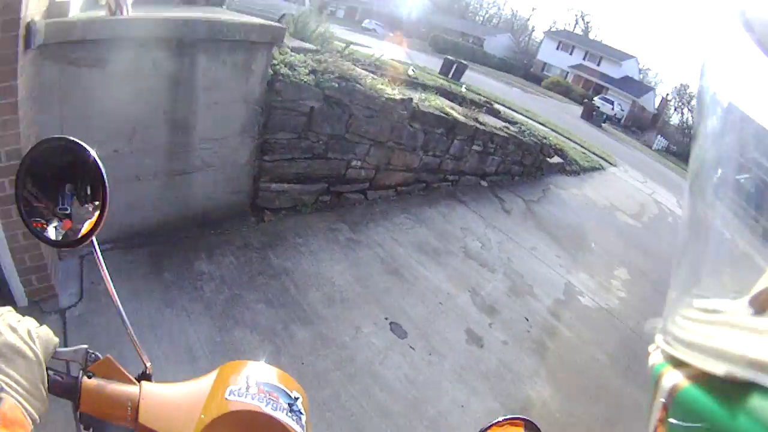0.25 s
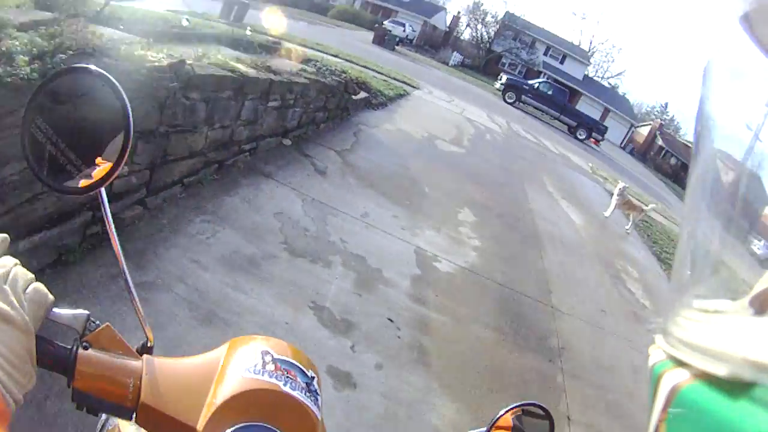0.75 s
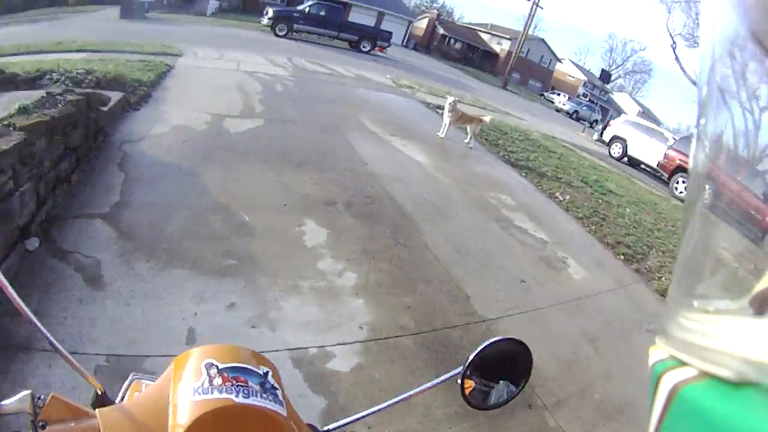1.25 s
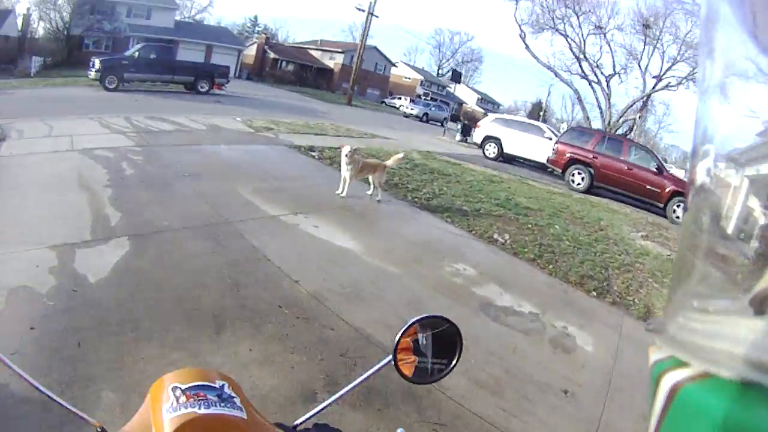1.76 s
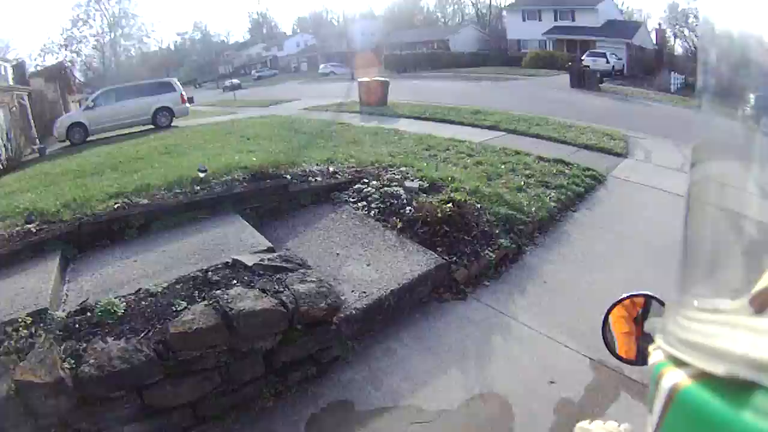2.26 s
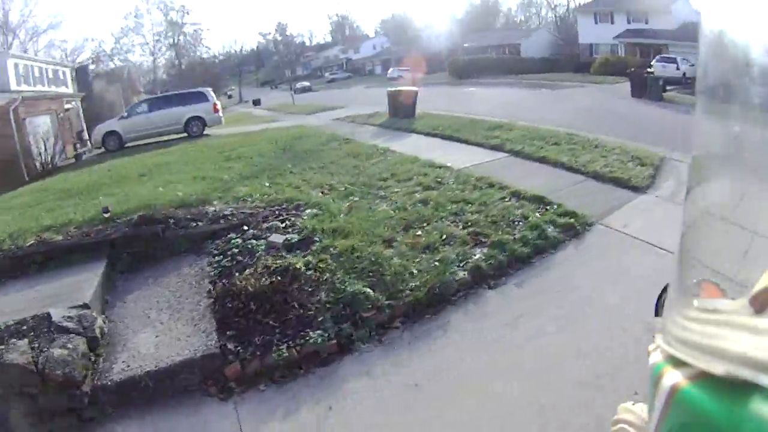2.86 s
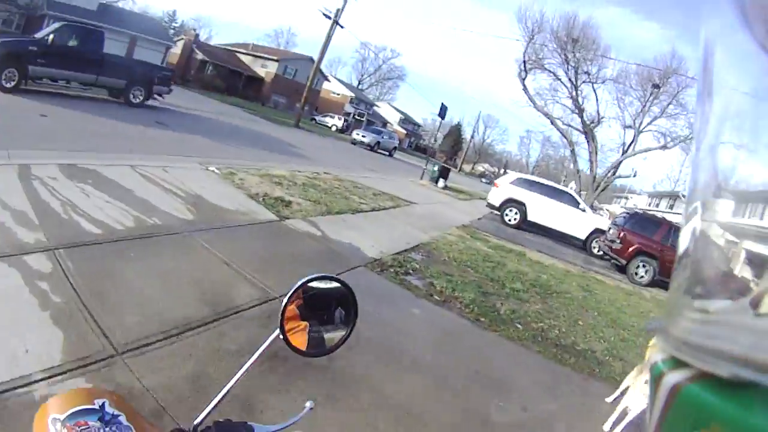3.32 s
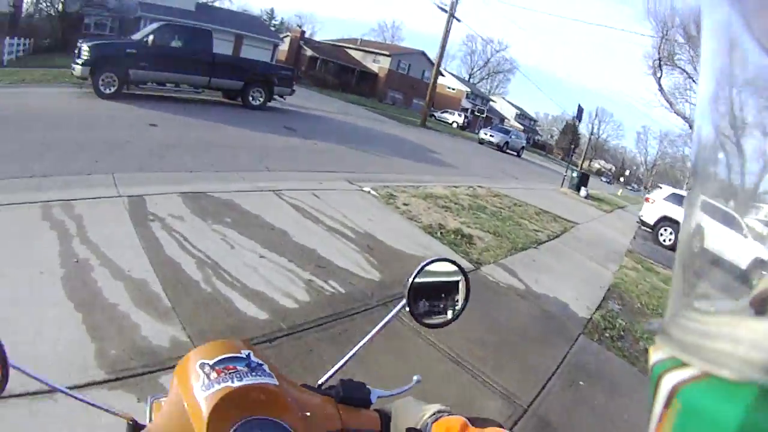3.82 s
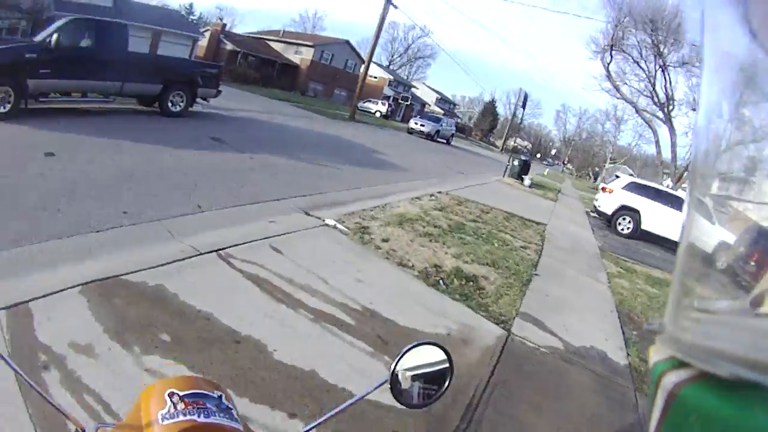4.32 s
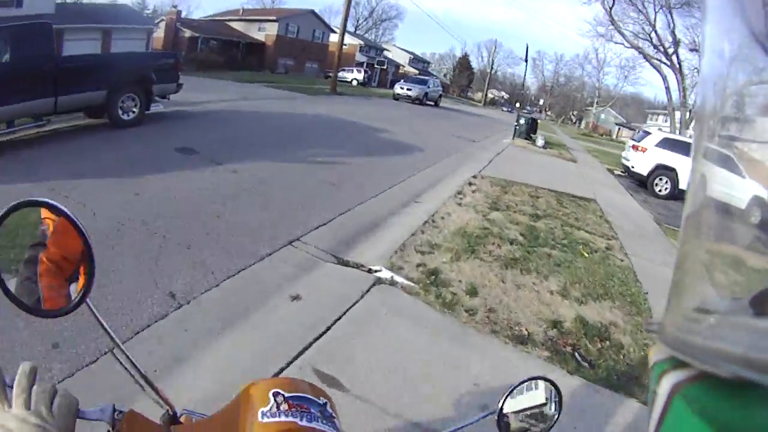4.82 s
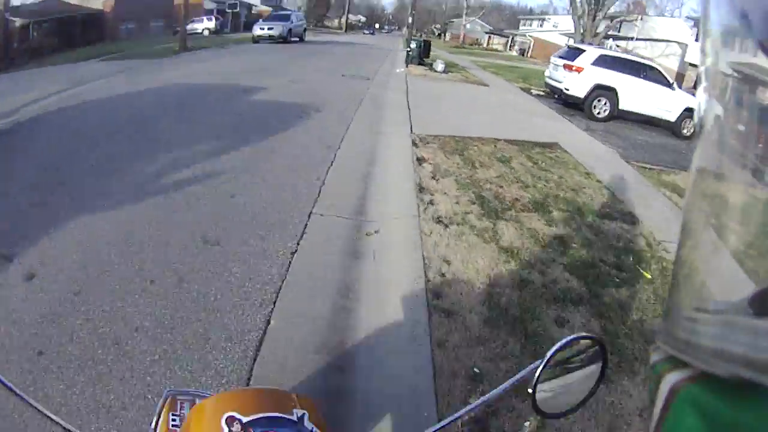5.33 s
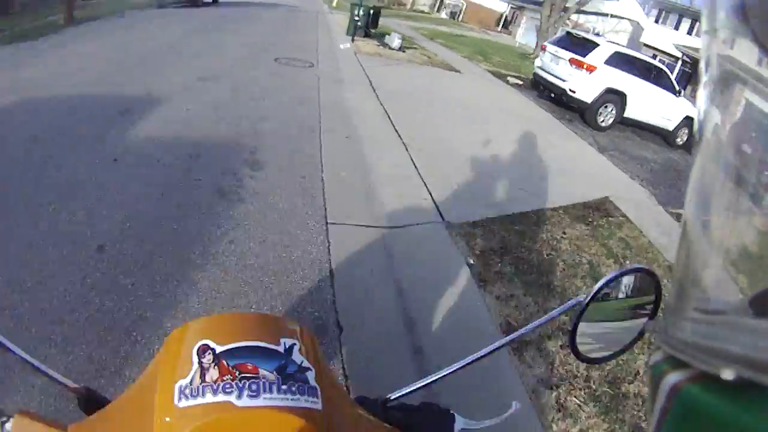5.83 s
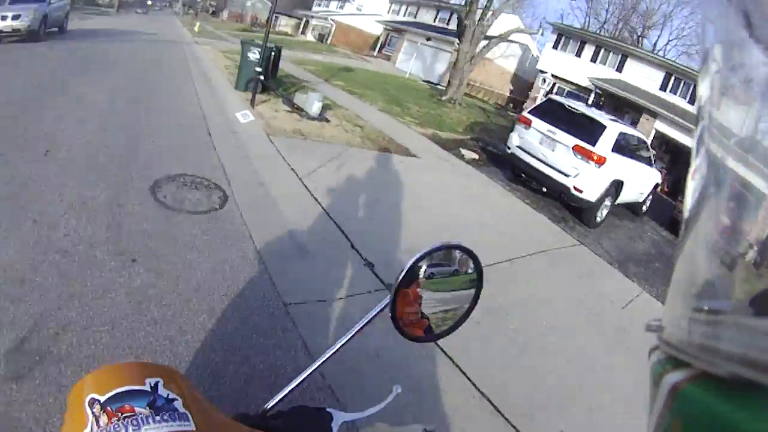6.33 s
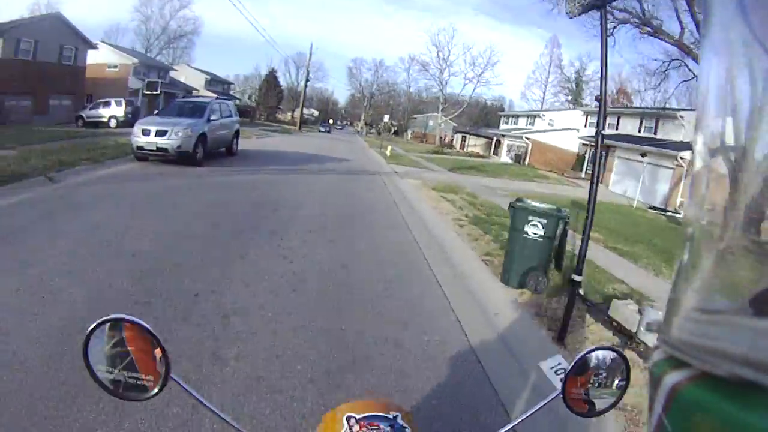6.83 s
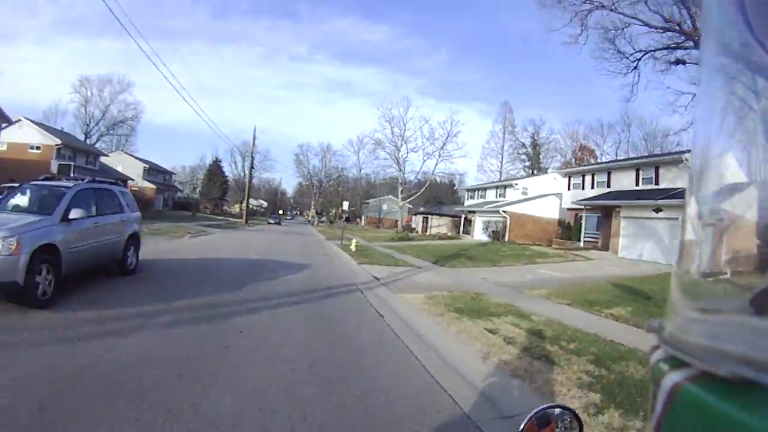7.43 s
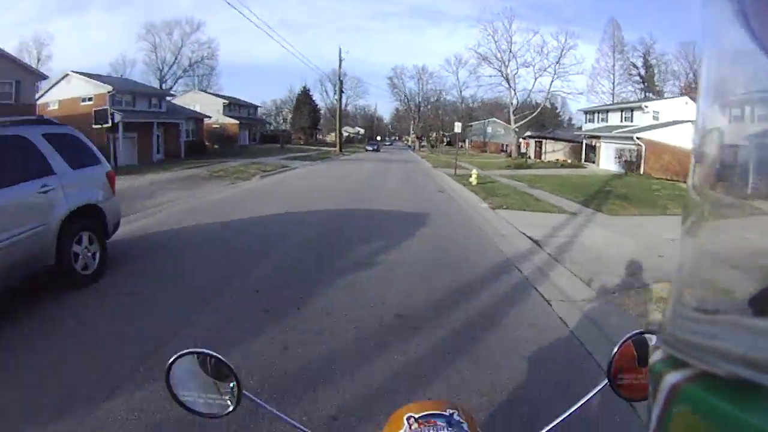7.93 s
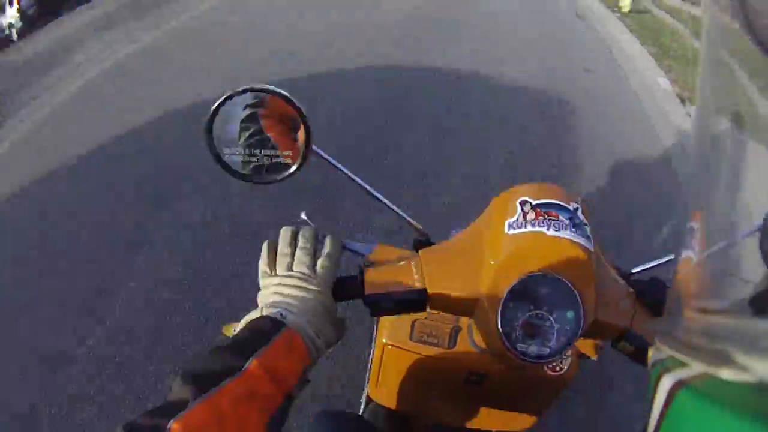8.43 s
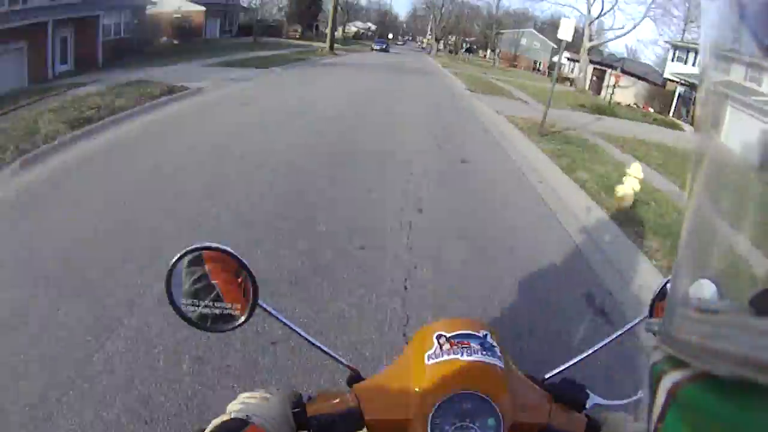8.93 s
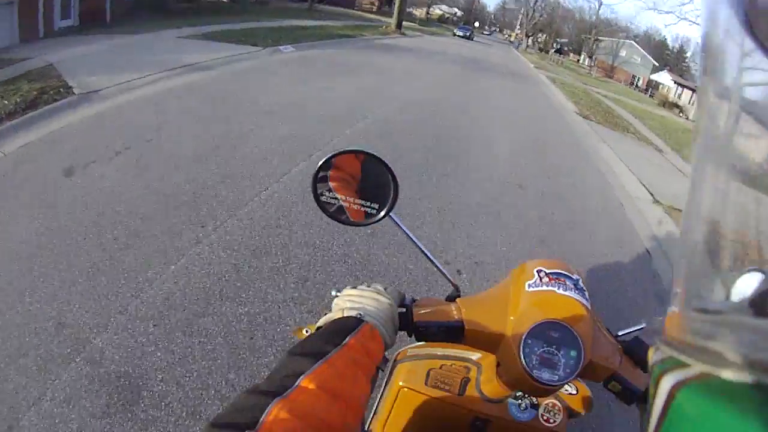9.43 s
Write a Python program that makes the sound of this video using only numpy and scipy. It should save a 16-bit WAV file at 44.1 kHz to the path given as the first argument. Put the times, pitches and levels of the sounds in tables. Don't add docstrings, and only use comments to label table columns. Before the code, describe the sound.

A small scooter engine fires in hollow, irregular pops, first in short runs, then as lonely putts among dull bumps and one hard jolt. It pulls away smoothly, pitch rising to a barking buzz, drops off, pops back and revs up again. Finally the firing stops, leaving whine, dull gusts, faint engine purr and gritty trim rattle. Mono, close, boxy, outdoors, little deep bass or treble.

```python
import sys
import numpy as np
from scipy import signal
from scipy.io import wavfile
from scipy.ndimage import uniform_filter1d

SR = 44100
rng = np.random.default_rng(int(sys.argv[2]) if len(sys.argv) > 2 else 0)


def linear_from_db(decibels):
    return 10 ** (np.asarray(decibels, float) / 20)


def wrap_up_sound(samples):
    columns = np.atleast_2d(samples).T
    tamed = np.clip(columns, -1, 1)
    steps = np.round(tamed * 32767).astype(np.int16)
    wavfile.write(sys.argv[1], SR, steps)


N = 426447

# t/s, speed/turns per s
CRANK_SPEED = [(.7, 39.5), (.969, 36.4), (1.399, 46), (1.7, 43), (1.95, 50), (2.2, 47), (3.5, 47),
               (4.1, 39), (4.584, 43.9), (5.5, 69), (6.1, 80), (6.37, 80.5), (6.8, 61), (7.38, 63.8),
               (8.218, 81.2), (8.9, 85.5), (9.08, 62), (9.67, 65.5)]
# start t/s, end t/s, fresh charge level/dB, extra boom/dB, extra bark/dB
FULL_RUNS = [(0.631, 0.855, -10, 1, -7), (0.908, 1.121, -12, 8.5, -5), (1.15, 1.404, -13, 7.5, -10.5),
             (1.819, 1.9, -10, -3, 6), (1.945, 1.966, -20.5, 4, 6), (2.845, 2.884, -14.5, 5, 2),
             (3.392, 3.456, -7.5, 3.5, 0), (4.377, 4.54, -7.5, 5.5, 0), (4.585, 4.7587, -8, 6.5, -2),
             (4.779, 4.935, -7.5, 3, -1.5), (4.9579, 5.104, -8.5, 3, -2.5), (5.122, 5.2735, -14, 7, -1.5),
             (5.305, 5.527, -14.5, 3, 1), (5.556, 5.672, -16, 2.5, 1), (5.698, 5.841, -15.5, -4.5, 3),
             (5.869, 5.984, -19, 2, 6.5), (6.024, 6.035, -27, -5, 9), (6.061, 6.073, -21.5, -7, 8),
             (6.868, 7.04, -15.5, 7.5, 5), (7.072, 7.167, -17, 5.5, 5.5), (7.1998, 7.281, -16.5, 6, 5),
             (7.3122, 7.615, -17.5, 1.5, 3), (7.646, 7.789, -21, 1.5, 3.5), (7.801, 8.03, -19.5, 1.5, 5),
             (8.0426, 8.1947, -19.5, -6.5, 2), (9.089, 9.2, -28.5, -1.5, 1),
             (9.234, 9.436, -27.5, -2, -0.5)]
HALF_RUNS = [
    (0.207, 0.308, -9.5, -4, -5.5),
    (0.484, 0.583, -10.5, 1.5, -3),
    (1.704, 1.748, -14, -8, 0),
    (4.079, 4.33, -8, 7.5, 1.3),
    (6.097, 6.15, -22, 3.5, 8.5),
    (6.185, 6.309, -21, -9, 8),
    (6.8, 6.834, -12, 4, 7.5),
]
# t/s, pop level/dB, extra bark/dB
LONE_POPS = [(0.068, -9, -12.5), (0.38, -10.5, -4), (1.461, -14, -1), (1.546, -22.5, 3), (1.604, -17.5, -6),
             (1.643, -17.5, -6), (1.997, -13.5, 4.5), (2.176, -17.5, 2.5), (2.345, -15.5, -13),
             (2.504, -17, -6), (2.676, -13, -6), (2.796, -15, -2), (2.924, -15, 1), (3.087, -9.5, 3),
             (3.259, -7.5, 3.5), (3.35, -6, 6), (3.601, -10.5, 3), (3.711, -8, 2), (3.802, -7, 1),
             (3.903, -8, 2), (4.002, -8, -0.5), (0.131, -19, -18), (0.881, -14, -5), (6.16, -22, 10),
             (6.358, -20.5, 9.5), (6.734, -9, 9)]
RESTARTS = [0.777, 0.8278, 4.468, 5.353, 5.414, 5.458, 5.5, 5.604, 5.646, 5.745, 5.799, 5.957, 6.918, 6.968,
            7.022, 7.134, 9.122, 9.168]
# f/Hz, level/dB, t60/s
BOOM_MODES = [(140.5, -4.5, 0.043), (252.6, 6, 0.077)]
POP_MODES = [(473.2, -2, 0.081), (564, -2, 0.039)]
BARK_MODES = [(693.2, 2, 0.083), (959, -19, 0.086), (1065, -21.5, 0.019), (1350, -33.5, 0.019),
              (2010, -31, 0.029), (2530, -38, 0.053)]
# t/s, lag/s, level/dB
WALL_ECHO = [(.07, 0.009, -5), (.257, .0085, 1), (.308, .008, -7.5), (.381, 0.0065, -2), (.484, 0.0053, -1),
             (.533, 0.0072, -4), (.631, 0.0077, -3), (.778, 0.013, -10), (.83, .010, -7.5), (.88, .009, 2),
             (.91, .010, -4.5), (.94, .0092, -5.5), (1.1, 0.0092, -24), (1.46, 0.0099, -18),
             (1.7, .008, -5), (1.82, 0.00908, -14), (1.949, 0.0087, -7), (2.18, 0.00683, -9),
             (2.35, 0.0072, -4.5), (2.5, 0.0086, -7.5), (3.0, 0.0068, -13), (3.3, 0.0093, -34),
             (7.3, 0.006, -30.5), (7.5, 0.0061, -16), (7.75, 0.0066, -8), (7.9, .0068, -19),
             (8.099, 0.0053, -12.5)]
# t/s, upper over lower level/dB
HEAD_TURN = [(0, 4), (.6, 2.5), (.8, 6.5), (.95, 0.5), (1.35, -2.5), (1.85, 4), (2.2, 6.5), (2.7, -1),
             (3.3, 0), (4.0, -0.4), (4.8, 2.6), (5.35, 1), (5.9, -3.2), (6.4, 1.3), (7.0, 3.5), (7.5, 1.5),
             (7.9, 0), (8.2, 0)]
# f/Hz, level/dB, t60/s
SHELL_MODES = [(888, 1.5, 0.047), (1066, 0.5, 0.046)]
# t/s, level/dB
SHELL_LEVEL = [(2.0, -28), (2.15, -14.5), (2.9, -11.5), (3.1, -13.5), (3.3, -37), (5.2, -29.5), (5.5, -20),
               (6.4, -40.5), (7, -39), (7.4, -22.5), (8.2, -20), (8.5, -30.5)]
# (t/s, level/dB)
PANELS = [
    (2370, 0.045, [(.55, -95), (.7, -68), (.8, -61.5), (1.36, -61), (1.45, -95)]),
    (975, 0.06, [(5.9, -95), (6.02, -59), (6.2, -56), (6.37, -56), (6.42, -95)]),
    (1480, 0.03, [(.75, -95), (.83, -63), (1.3, -63), (1.42, -95)]),
    (2450, 0.045, [(9.06, -95), (9.1, -74), (9.25, -71), (9.5, -68), (9.58, -95)]),
]
# slack f/Hz, rise at full strain/Hz, t60/s, level/dB
CASING_WALLS = [(1334, 11, 0.022, -46), (1463, 230, 0.038, -54.5), (2160, 120, 0.014, -63.5),
                (3350, 300, 0.014, -69), (5700, 10, 0.011, -73.5), (5940, 10, 0.011, -74)]
# t/s, level/dB, strain/0-1
RAP_FORCE = [(0, 0, .1), (1.0, 0, .1), (1.4, 0, .2), (2.3, 5, .1), (3.0, 5, .1), (4.0, 0, .1), (4.6, 1, 0),
             (5.2, 2, 0), (5.8, 0, .3), (7.0, 1, .3), (7.4, 3, .5), (7.7, 5, .85), (8.2, 6, 1.0),
             (9.1, -3, .5), (9.4, 1, .6)]
# multiple of crank rate, level/dB
FRAME_ORDERS = [(1, -55.5), (2, -29), (3, -49.5), (4, -46.5)]
# cycles per turn, start t/s, end t/s
WHINES = [(16.6, 6.36, 6.71), (8, 6.4, 6.7), (8, 8.25, 8.84), (6, 5.95, 6.7), (14, 1.1, 1.45),
          (14, 1.8, 2.1), (13, .95, 1.4), (4, 9.1, 9.67), (7, 9.2, 9.67), (9, 5.95, 6.7), (6, 1.12, 1.4),
          (10, 6.52, 6.69), (15, 1.05, 1.38), (20, .93, 1.08)]
# start level/dB, end level/dB
WHINE_LEVELS = [(-56, -42.5), (-41, -28), (-31, -36), (-36.5, -39), (-28, -36), (-41, -33), (-28, -28.5),
                (-39.5, -33.5), (-45.5, -32.5), (-40, -36.5), (-33.5, -32), (-43, -33), (-37, -33),
                (-32, -40)]
# t/s, gas flow level/dB, road rumble level/dB, frame rattle level/dB
RIDE_LEVELS = [(0.0, -27, -31.5, -39), (0.5, -28.5, -43, -45), (0.8, -21.5, -30, -36),
               (1.18, -24.5, -33, -34), (1.65, -30, -39.5, -41.5), (1.86, -16, -37.5, -34),
               (2.1, -36.5, -41.5, -45.5), (2.8, -26, -29.5, -39.5), (3.55, -28, -42, -49),
               (4.17, -24.5, -26, -44.5), (5.1, -35.5, -43, -42.5), (5.55, -12, -32, -33.5),
               (6.2, -31, -28, -46.5), (6.62, -20.5, -38, -40), (6.9, -16, -37.5, -40.5),
               (8.2, -24, -44, -44.5), (8.95, -34, -42, -69), (9.3, -42, -41, -54), (9.67, -19, -36, -24)]
# t/s, share/0-1
COASTING = [
    (6.33, 0),
    (6.38, .8),
    (6.79, .8),
    (6.82, 0),
]
# f/Hz, width/Hz, level/dB
RUSTLE_BANDS = [(469, 62, -2), (536, 104, 1.5), (700, 83, 0.5)]
# f/Hz, level/dB per Hz
CLATTER_SPECTRUM = [(850, -3.5), (970, 0.5), (1200, -13), (1500, -5), (1900, -14), (2300, -16), (2850, -21),
                    (3500, -40), (4100, -27.5), (5900, -49.5), (8000, -60.5), (10000, -64), (13000, -66)]
# f/Hz, width/Hz, level/dB
CASING_BANDS = [(1420, 120, -8.5), (2302, 300, -0.5), (2455, 83, -6), (3650, 640, -11), (3740, 160, -8.5),
                (6230, 950, -6)]
# t/s, peak level/dB, f/Hz, t60/s
THUMPS = [(1.778, -29, 239.4, 0.17), (1.796, -18.5, 305, 0.062), (1.829, -16.5, 236, 0.13),
          (2.217, -14.5, 280, 0.017), (2.249, -11, 342, 0.017), (2.291, -14, 199, 0.024),
          (2.755, -17.5, 204, 0.059), (2.78, -24, 241, 0.017), (2.81, -18.5, 185, 0.05),
          (3.147, -9.5, 189, 0.022), (3.157, -4.5, 302, 0.025), (3.169, -24, 300, 0.024),
          (5.957, -25, 288, 0.069), (6.513, -18.5, 300, 0.03), (3.159, -8, 620, 0.009),
          (6.692, -22, 249, 0.056), (6.702, -16, 253, 0.034)]
# t/s, peak level/dB, f/Hz, t60/s
HUMS = [
    (1.985, -16, 570, 0.16),
    (1.996, -13.5, 575, 0.07),
    (2.175, -13, 540, 0.14),
    (6.735, -10, 700, 0.072),
]
# t/s, peak level/dB
TICKS = [
    (2.0246, -49.5),
    (2.757, -50),
    (3.1622, -45.5),
    (4.1754, -51),
    (1.8145, -52),
    (2.657, -54),
    (5.554, -49),
    (6.945, -52),
    (9.573, -62),
    (9.666, -27),
]
# t/s, peak level/dB
SNAPS = [
    (2.0232, -38),
    (3.1598, -31.5),
    (8.917, -43),
    (9.0226, -48),
    (9.0525, -45),
    (9.208, -46),
    (9.3628, -40),
]
# t/s, peak level/dB
RATTLES = [(8.917, -29), (8.939, -52), (9.0244, -45), (9.0525, -39), (9.088, -43), (9.1248, -49),
           (9.1496, -32), (9.176, -50), (9.208, -44), (9.265, -54), (9.2898, -37), (9.3194, -42),
           (9.3628, -31), (9.408, -35), (9.42, -29), (9.433, -24), (9.444, -30), (9.452, -40), (9.459, -24),
           (9.47, -32), (9.48, -24), (9.492, -26), (9.505, -20), (9.5644, -20)]
# f/Hz, level/dB per Hz
RUMBLE_SPECTRUM = [(15, -60), (25, -21), (43, -28.5), (142, -4.5), (221, 1.5), (317, -2), (356, -3.5),
                   (400, -4.5), (520, -41), (880, -120)]
# f/Hz, level/dB per Hz
WIND_SPECTRUM = [(200, -2.5), (310, 9.5), (400, 3.5), (650, 0), (800, 1), (1500, -8.5), (2700, -22),
                 (4000, -33.5), (6500, -53.5)]
# t/s, level/dB
FIRST_GUST = [
    (8.12, -53),
    (8.24, -26.5),
    (8.4, -27),
    (8.53, -26),
    (8.6, -22),
    (8.76, -23.5),
    (8.84, -29.5),
    (8.92, -37.5),
    (9.05, -43),
]
SECOND_GUST = [
    (9.15, -38),
    (9.33, -39),
    (9.43, -24.5),
    (9.5, -28),
    (9.57, -21),
    (9.67, -22),
]
# t/s, level against the gust/dB
PORT_FACING = [
    (8.15, -12),
    (8.3, -9.5),
    (8.5, -18),
    (8.68, -11),
    (8.9, -11),
    (9.4, -1.5),
    (9.52, -19),
    (9.67, 3),
]


def in_time(rows):
    s, *columns = np.transpose(rows)
    return [np.interp(np.arange(N) / SR, s, column) for column in columns]


def rms_one(x):
    return x / np.sqrt(np.mean(x ** 2) + 1e-20)


def drift(rate_hz):
    r = np.exp(-2 * np.pi * rate_hz / SR)
    return rms_one(signal.lfilter([1], [1, -2 * r, r * r], rng.standard_normal(N + SR))[SR:])


def keep_band(x, low_hz, high_hz, order=2):
    return signal.sosfilt(signal.butter(order, [low_hz, high_hz], "band", fs=SR, output="sos"), x)


def keep_above(x, hz):
    return signal.sosfilt(signal.butter(2, hz, "high", fs=SR, output="sos"), x)


def keep_below(x, hz):
    return signal.sosfilt(signal.butter(3, hz, fs=SR, output="sos"), x)


def clicks(s, height):
    at = np.clip(np.asarray(s) * SR, 0, N - 2)
    out = np.full(N, 1e-18)
    np.add.at(out, at.astype(int), height * (1 - at % 1))
    np.add.at(out, at.astype(int) + 1, height * (at % 1))
    return out


def ring(x, hz, t60):
    r, w = linear_from_db(-60 / (t60 * SR)), 2 * np.pi * hz / SR
    return signal.lfilter([0, np.sin(w)], [1, -2 * r * np.cos(w), r * r], x)


def banded_noise(spectrum, gain_db, patchy_db, patch_hz):
    hz, db = np.transpose(spectrum)
    edges = np.geomspace(hz[0], hz[-1], int(3 * np.log2(hz[-1] / hz[0])) + 2)
    out, white, together = 0, rng.standard_normal((2, N)), drift(patch_hz)
    for k, (low, high) in enumerate(zip(edges, edges[1:])):
        alone = np.roll(together, 37813 * (k + 1))
        band_db = np.interp(np.log(low * high) / 2, np.log(hz), db)
        level = linear_from_db(band_db + patchy_db * (together + 1.2 * alone))
        out = out + level * keep_band(white[k % 2], low, high)
    return linear_from_db(gain_db) * rms_one(out)


def both(a_db, b_db):
    per_db = np.log(10) / 10
    return np.logaddexp(a_db * per_db, b_db * per_db) / per_db


def firings():
    lone_boom_db = -0.5
    full = [(*run, 1) for run in FULL_RUNS]
    half = [(*run, 2) for run in HALF_RUNS]
    lone = [(s, s, db, lone_boom_db, bark, 1) for s, db, bark in LONE_POPS]
    return np.array(sorted(full + half + lone))


def crank():
    time = np.arange(N) / SR
    log_speed = in_time([(s, np.log(speed)) for s, speed in CRANK_SPEED])[0]
    free = np.cumsum(np.exp(log_speed)) / SR
    first, last = np.interp(firings()[:, :2].T, time, free)
    gap_follows = np.append(first[1:] - last[:-1] > 1.5, True)
    ends = last[gap_follows & (last > first)]
    marks = np.sort(np.concatenate([first, ends, np.interp(RESTARTS, time, free)]))
    whole = np.cumsum(np.round(np.diff(marks, prepend=marks[0])))
    return free + np.interp(free, marks, whole - marks)


def strokes(turns, pump_db):
    sag_db, sag_turns, sag_ends_octaves = 4.5, 0.94, .25
    misfire_top_db, slack_s = -25, .004
    s = np.interp(np.arange(np.ceil(turns[0]), turns[-1]), turns, np.arange(N) / SR)
    pump = np.minimum(pump_db[(s * SR).astype(int)], misfire_top_db) + 1.5 * rng.standard_normal(len(s))
    turn = np.arange(len(s))
    fresh_db, fired = np.zeros(len(s)), np.zeros(len(s), bool)
    extra = np.zeros((2, len(s)))
    for first, last, db, boom, bark, every in firings():
        on = turn[(s > first - slack_s) & (s < last + slack_s)][::int(every)]
        fresh_db[on], fired[on] = db, True
        extra[:, on] = [[boom], [bark]]
    fired[np.searchsorted(s, np.array(RESTARTS) - slack_s) - 1] = False

    streak = turn - np.maximum.accumulate(np.where(fired, 0, turn)) - 1
    octaves = np.log2(1 / np.gradient(s) / 55)
    sag = sag_db * np.clip(1 - octaves / sag_ends_octaves, .2, 1)
    pop_db = fresh_db - sag * (1 - np.exp(-np.maximum(streak, 0) / sag_turns))
    boom_db = extra[0] - 26 + (pop_db + 13) + 11 * octaves
    bark_db = extra[1] - 20.5 + .54 * (pop_db + 13) + .25 * octaves
    pop = linear_from_db(np.where(fired, pop_db, pump))
    boom = linear_from_db(np.where(fired, boom_db, pump - 5.5))
    bark = linear_from_db(np.where(fired, bark_db, pump - 5.5))
    return s, pop, boom, bark, 1. * fired


def exhaust(s, pop, boom, bark):
    dip_hz, dip_width_hz = 903, 130
    at, lag, wall_db = np.transpose(WALL_ECHO)
    lag, wall = np.interp(s, at, lag), linear_from_db(np.interp(s, at, wall_db))
    upper_db = np.interp(s, *np.transpose(HEAD_TURN))
    groups = [(POP_MODES, pop, -1.0, upper_db), (BOOM_MODES, boom, 3.5, 0), (BARK_MODES, bark, 1.5, 0)]
    out = 0
    for modes, height, trim_db, tilt_db in groups:
        for k, (hz, db, t60) in enumerate(modes):
            uneven = linear_from_db(.6 * rng.standard_normal(len(s)))
            heard = height * linear_from_db((k - .5) * tilt_db)
            parts = [(-.0018, .35), (0, 0.68 * uneven), (.00214, .3), (.008513, -.2),
                     (lag, wall), (lag + .0085, -.55 * wall)]
            times = np.concatenate([s + delay for delay, _ in parts])
            heights = np.concatenate([share * heard for _, share in parts])
            out = out + (-1) ** k * linear_from_db(db + trim_db) * ring(clicks(times, heights), hz, t60)
    out = signal.lfilter(*signal.iirnotch(dip_hz, dip_hz / dip_width_hz, fs=SR), out)
    return keep_band(out, 100, 2300, order=3)


def shell(s, blow):
    struck = clicks(s, blow) * linear_from_db(in_time(SHELL_LEVEL)[0])
    rung = sum(linear_from_db(db) * ring(struck, hz, t60) for hz, db, t60 in SHELL_MODES)
    return keep_band(rung, 750, 1300)


def rap(s, blow):
    rap_share = 0.3
    s, blow = s[blow > 0] - .003, blow[blow > 0]
    at, level_db, strain = np.transpose(RAP_FORCE)
    index = np.ceil(s * SR).astype(int)[:, None] + np.arange(900)
    age = index / SR - s[:, None]
    rung = 0
    for hz, rise_hz, t60, db in CASING_WALLS:
        pitch = hz + rise_hz * np.interp(s, at, strain)[:, None]
        rung = rung + linear_from_db(db - 60 * age / t60) * np.sin(2 * np.pi * pitch * age)
    force = blow ** rap_share * linear_from_db(np.interp(s, at, level_db) + 11)
    rung = rung * (1 - np.exp(-age / .0006)) * force[:, None]
    return np.bincount(index.ravel(), rung.ravel(), N + SR)[:N]


def panel(s, blow):
    puffs = signal.lfilter([.35], [1, -.995], clicks(s - .003, blow)) * rng.standard_normal(N)
    blows = puffs + clicks(s - .003, 9 * blow)
    out = 0
    for hz, t60, level in PANELS:
        out = out + linear_from_db(in_time(level)[0]) * keep_band(ring(blows, hz, t60), hz - 300, hz + 300)
    return out


def frame_orders(turns, load):
    shake = load ** 2 * (in_time(CRANK_SPEED)[0] / 76) ** 5.9
    return shake * sum(linear_from_db(db) * np.sin(2 * np.pi * round(k) * turns) for k, db in FRAME_ORDERS)


def whines(turns):
    fade_in_s, fade_out_s = .12, .07
    out, waver_db = np.zeros(N), 1.3 * drift(15)
    for k, ((teeth, start, end), (start_db, end_db)) in enumerate(zip(WHINES, WHINE_LEVELS)):
        s = [start - fade_in_s, start, end, end + fade_out_s]
        level_db = [start_db - 40, start_db, end_db, end_db - 40]
        on = np.arange(int(s[0] * SR), min(int(s[-1] * SR), N))
        level = linear_from_db(np.interp(on / SR, s, level_db) + waver_db[(on + 37813 * k) % N])
        out[on] += np.sqrt(2) * level * np.sin(2 * np.pi * teeth * turns[on])
    return out


def rustle(rustle_db):
    out = 0
    for hz, width_hz, db in RUSTLE_BANDS:
        noise = keep_band(rng.standard_normal(N), hz - width_hz / 2, hz + width_hz / 2)
        out = out + linear_from_db(db + 3.2 * drift(4.2)) * rms_one(noise)
    return linear_from_db(rustle_db) * rms_one(out)


def clatter(s, blow, clatter_db, hush_db):
    fade = linear_from_db(-60 / (.06 * SR))
    flare = signal.lfilter([1], [1, -fade], clicks(s - .004, blow ** .5))
    flare = signal.lfilter([.02], [1, -.98], flare)
    noise = banded_noise(CLATTER_SPECTRUM, gain_db=-4.5, patchy_db=1.5, patch_hz=25.24)
    for hz, width_hz, db in CASING_BANDS:
        noise = noise + linear_from_db(db) * keep_band(noise, hz - width_hz / 2, hz + width_hz / 2)
    top = keep_above(noise, 2800)
    return noise * (linear_from_db(clatter_db) + linear_from_db(hush_db - 32.5) * flare) + top * linear_from_db(hush_db - 44.0) * flare


def knocks():
    thumps = sum(ring(clicks([s], linear_from_db(db)), hz, t60) for s, db, hz, t60 in list(THUMPS) + list(HUMS))
    snap_s, snap_db = np.transpose(SNAPS)
    tick_s, tick_db = np.transpose(TICKS)
    snaps = keep_band(clicks(snap_s, linear_from_db(snap_db + 14.5)), 1100, 3600)
    ticks = keep_band(clicks(tick_s, linear_from_db(tick_db + 14.0)), 700, 13000)
    return keep_band(thumps, 130, 800) + snaps + ticks


def rattles():
    s, db = np.transpose(RATTLES)
    bursts = signal.lfilter([1], [1, -.988], clicks(s, linear_from_db(db + 11))) * rng.standard_normal(N)
    return keep_below(keep_band(bursts, 900, 3500), 1750)


def shudder():
    start_db, t60_s = -31, 0.46
    s = np.transpose(THUMPS)[0]
    dying = signal.lfilter([1], [1, -linear_from_db(-60 / (t60_s * SR))], clicks(s, linear_from_db(start_db)))
    return 20 * np.log10(uniform_filter1d(dying, size=600) + 1e-6)


def road_rumble(rumble_db):
    return banded_noise(RUMBLE_SPECTRUM, gain_db=both(rumble_db, shudder()), patchy_db=1.4, patch_hz=6.5)


def wind(gust_db):
    gusts = banded_noise(WIND_SPECTRUM, gain_db=gust_db, patchy_db=1.6, patch_hz=45)
    hiss = linear_from_db(in_time(PORT_FACING)[0]) * keep_above(gusts, 1200)
    return hiss + keep_below(gusts, 3800)


def scene():
    flow_db, jolt_db, rattle_db = in_time(RIDE_LEVELS)
    gust_db = in_time(list(FIRST_GUST) + list(SECOND_GUST))[0]
    turns = crank()
    s, pop, boom, bark, fired = strokes(turns, flow_db - 3)
    blow = pop * fired
    load = uniform_filter1d(np.interp(np.arange(N) / SR, s, fired), size=3500)
    smooth = np.minimum(1.35 * load, 1) ** 2

    rustle_db = both(flow_db - 2.5, gust_db - 8.5)
    quiet = np.maximum(smooth, in_time(COASTING)[0])
    rustle_db = rustle_db + quiet * np.minimum(-38 - rustle_db, 0)
    rumble_db = both(jolt_db, gust_db - 7.5)
    rumble_db = rumble_db + smooth * np.minimum(-43 - rumble_db, 0)
    clatter_db = both(rattle_db, gust_db - 13.5)
    hush_db = -6 * smooth

    engine = exhaust(s - .0022, pop, boom, bark) + shell(s, blow) + rap(s, blow) + panel(s, fired)
    engine = engine + frame_orders(turns, load) + whines(turns)
    engine = engine + rustle(rustle_db) + clatter(s, blow, clatter_db + hush_db, hush_db)
    return (engine + knocks() + rattles() + road_rumble(rumble_db) + wind(gust_db))[None]


def band_limit(x):
    return signal.sosfilt(signal.butter(12, 15200, fs=SR, output="sos"), x)


def record(dry):
    muffled = signal.sosfilt(signal.butter(2, 50, "high", fs=SR, output="sos"), dry)
    muffled = keep_below(muffled, 9000)
    mix = .8 * np.tanh(muffled / .8)
    return band_limit(mix)


dry = scene()
out = record(dry)
wrap_up_sound(out)
```